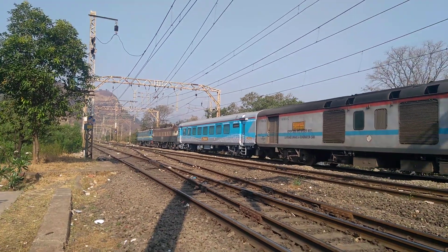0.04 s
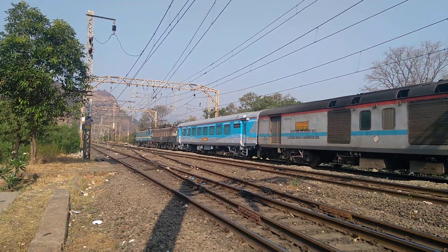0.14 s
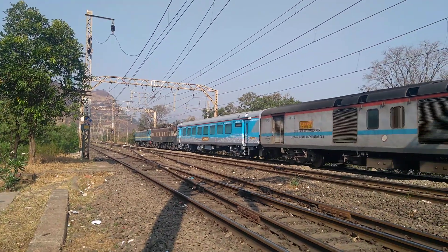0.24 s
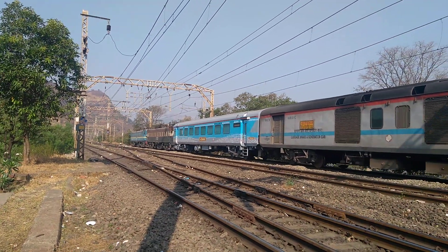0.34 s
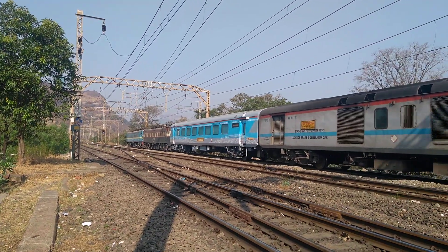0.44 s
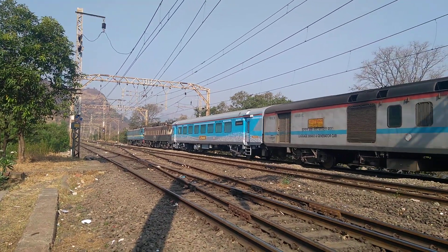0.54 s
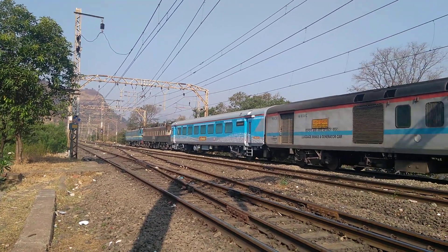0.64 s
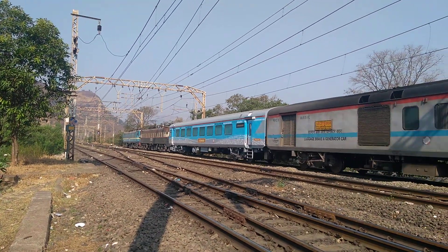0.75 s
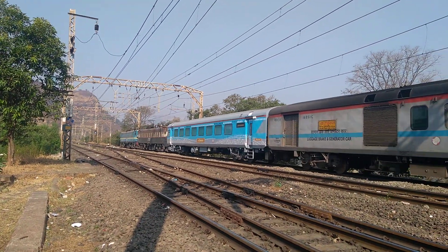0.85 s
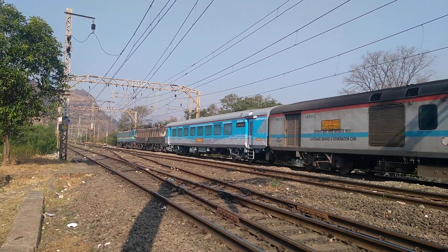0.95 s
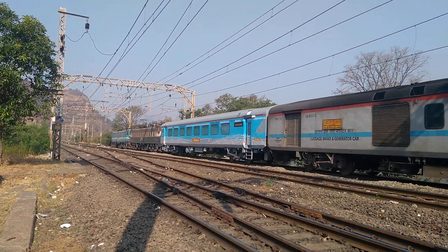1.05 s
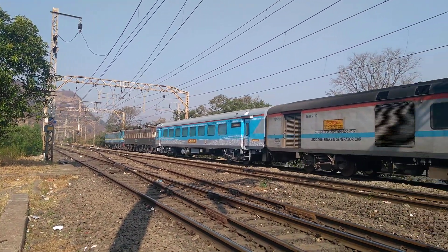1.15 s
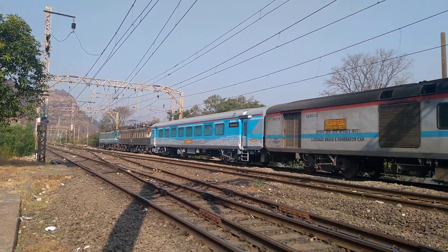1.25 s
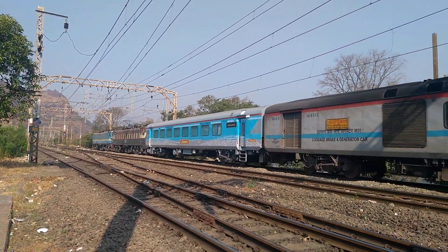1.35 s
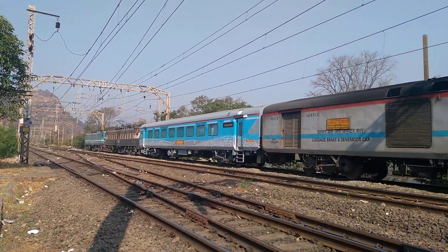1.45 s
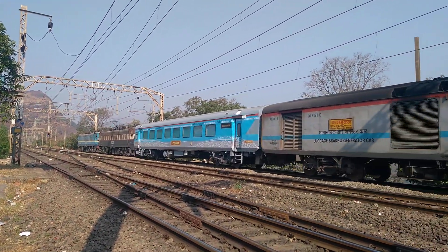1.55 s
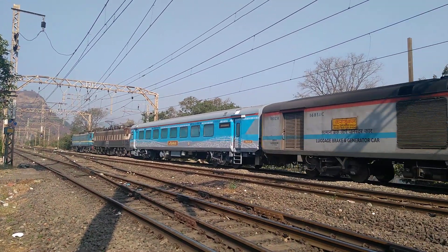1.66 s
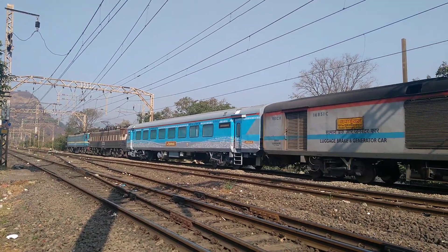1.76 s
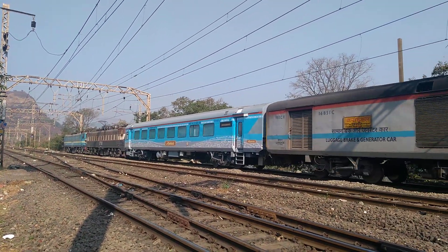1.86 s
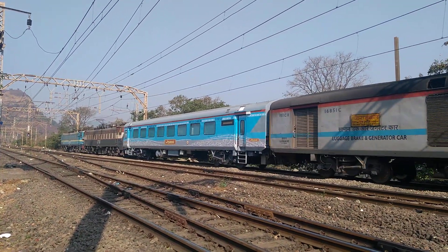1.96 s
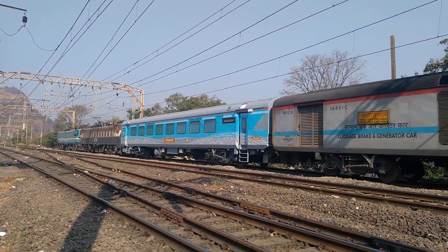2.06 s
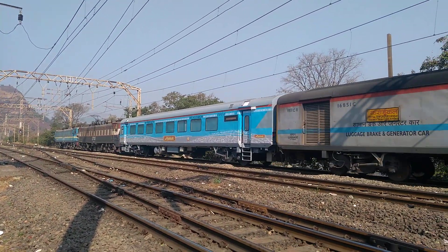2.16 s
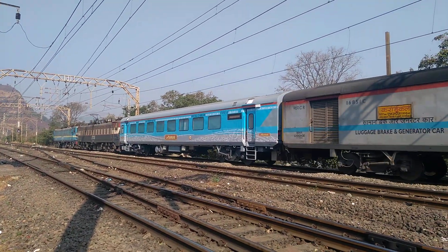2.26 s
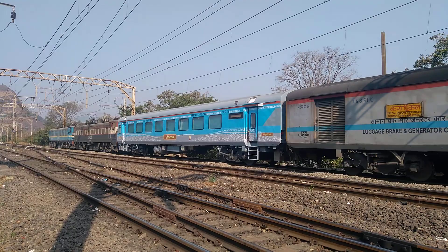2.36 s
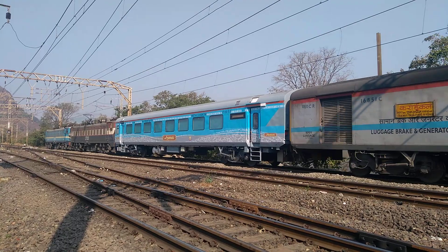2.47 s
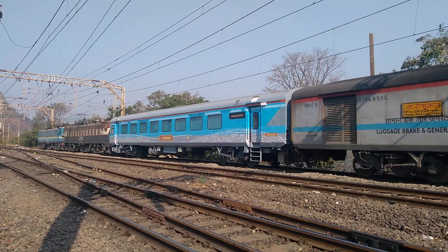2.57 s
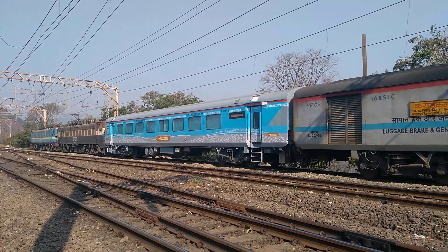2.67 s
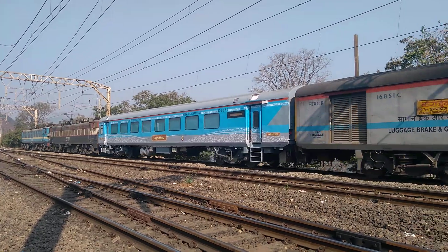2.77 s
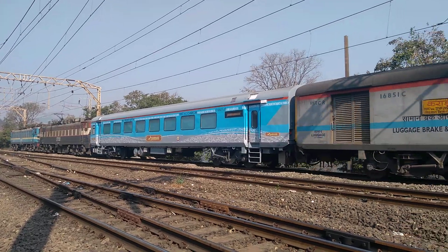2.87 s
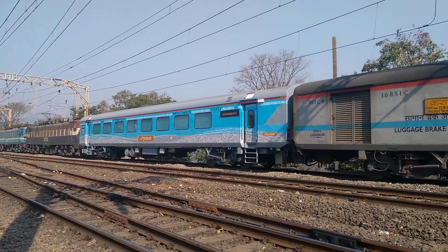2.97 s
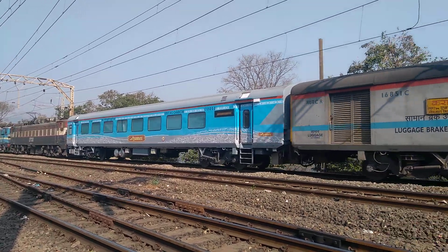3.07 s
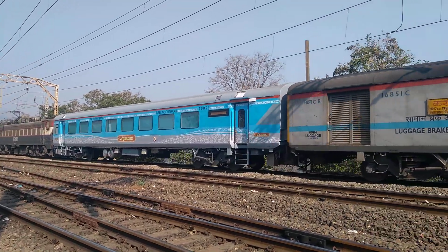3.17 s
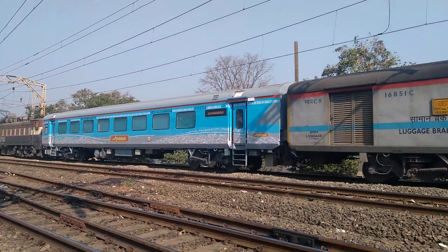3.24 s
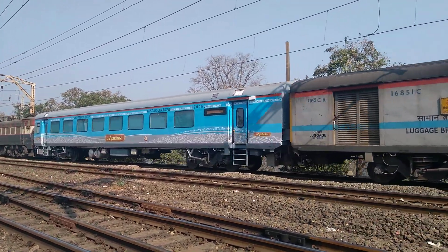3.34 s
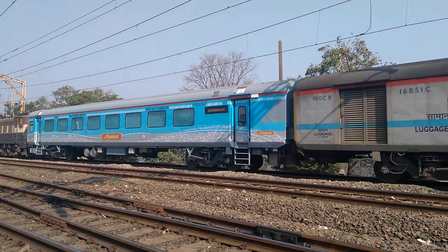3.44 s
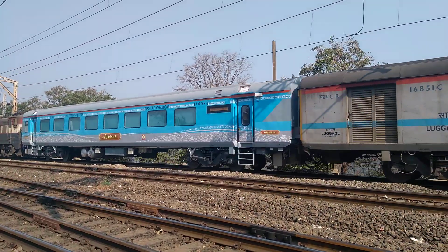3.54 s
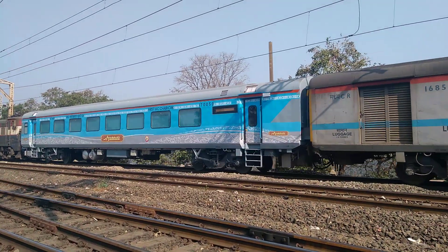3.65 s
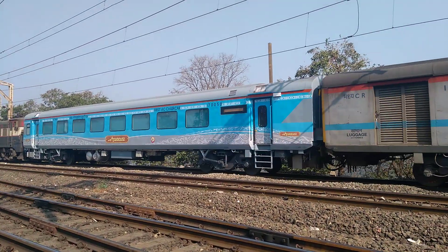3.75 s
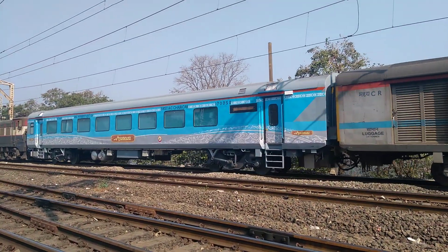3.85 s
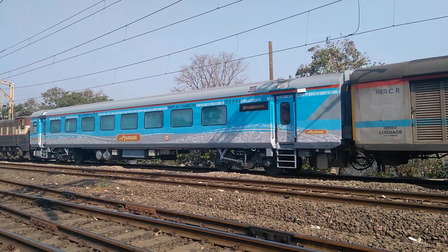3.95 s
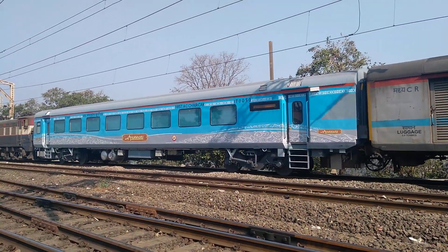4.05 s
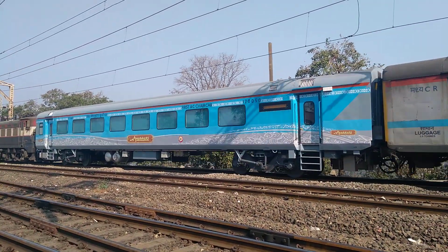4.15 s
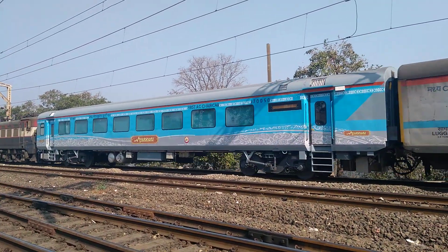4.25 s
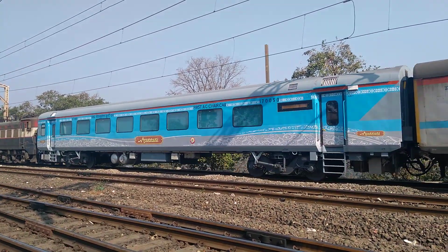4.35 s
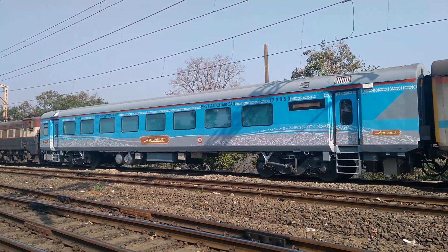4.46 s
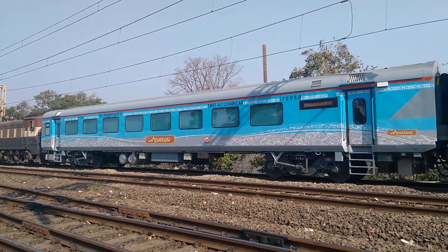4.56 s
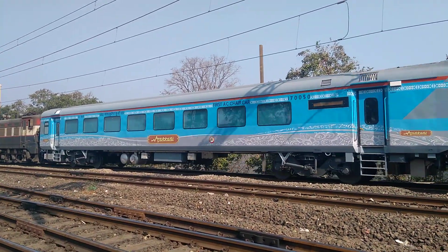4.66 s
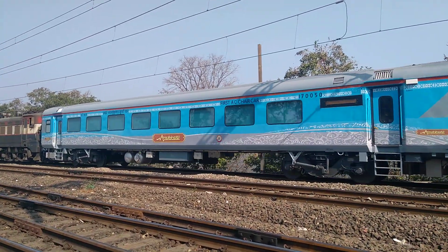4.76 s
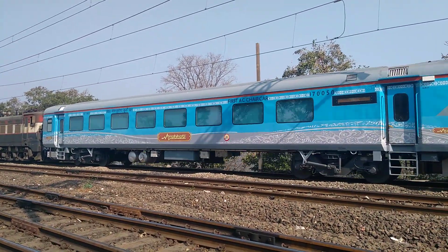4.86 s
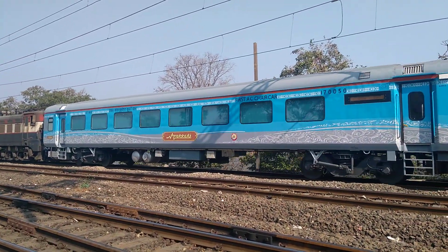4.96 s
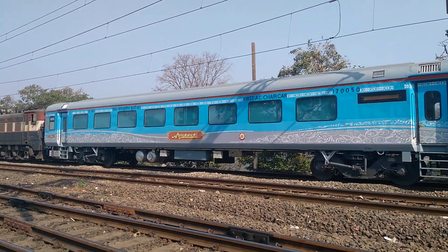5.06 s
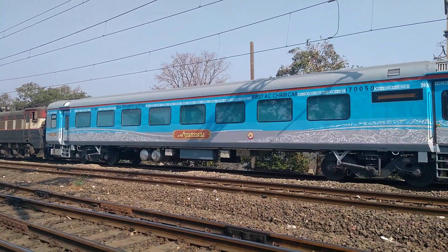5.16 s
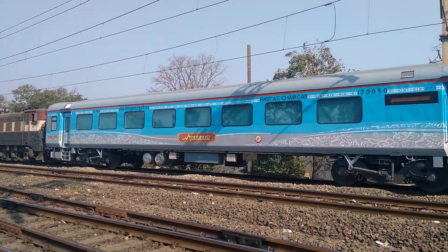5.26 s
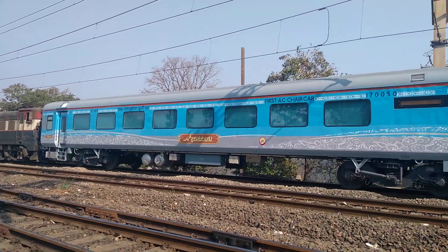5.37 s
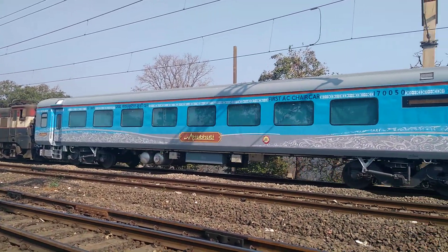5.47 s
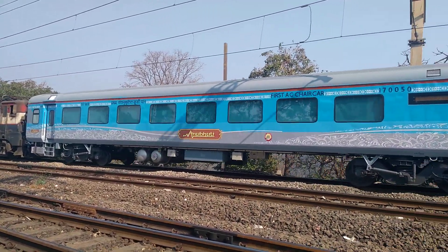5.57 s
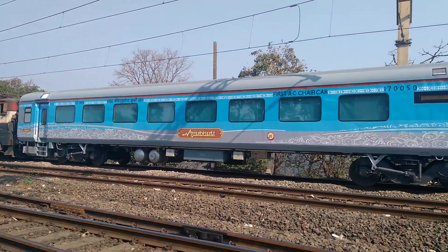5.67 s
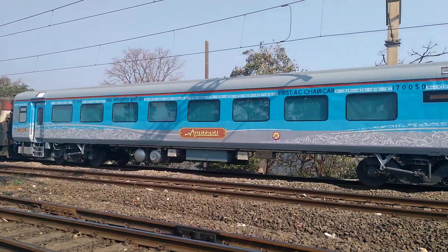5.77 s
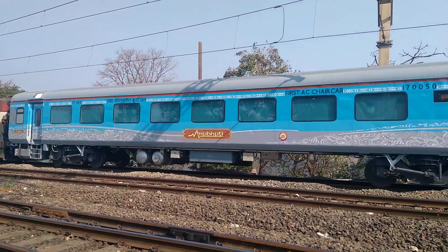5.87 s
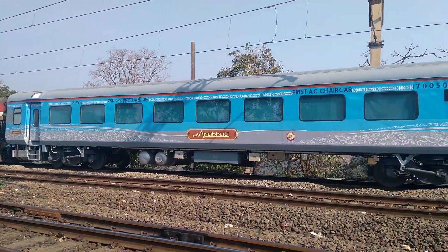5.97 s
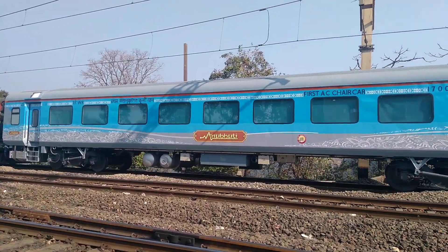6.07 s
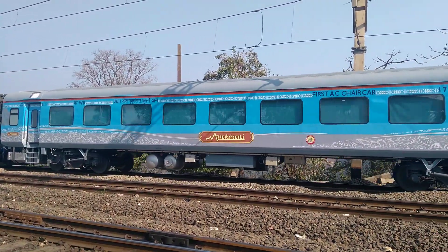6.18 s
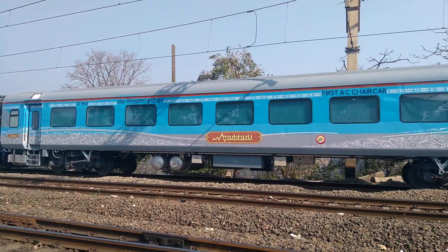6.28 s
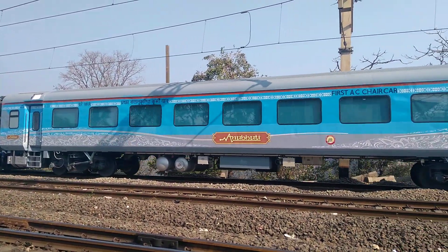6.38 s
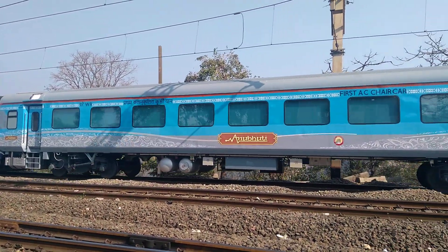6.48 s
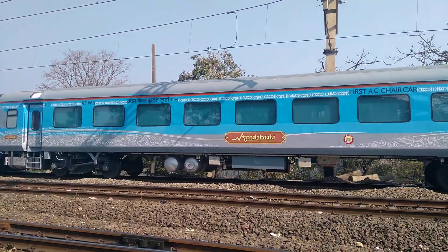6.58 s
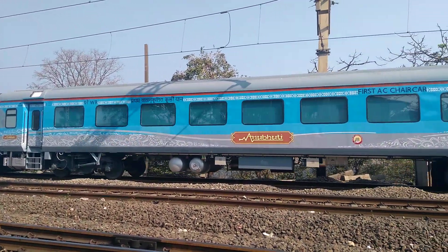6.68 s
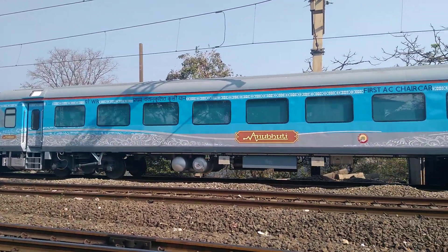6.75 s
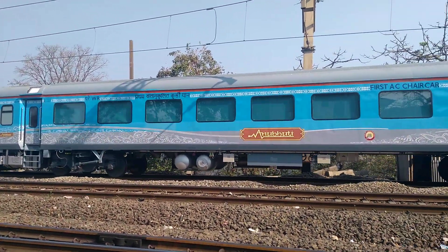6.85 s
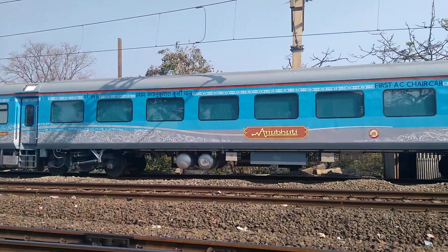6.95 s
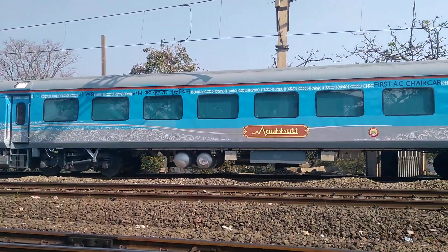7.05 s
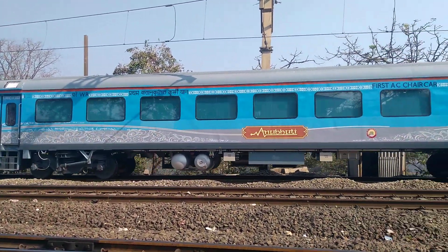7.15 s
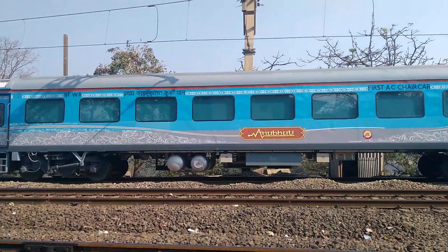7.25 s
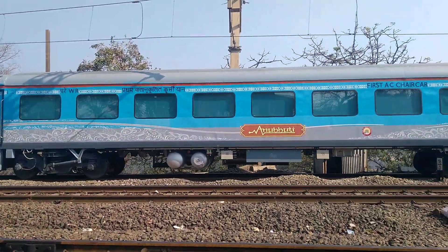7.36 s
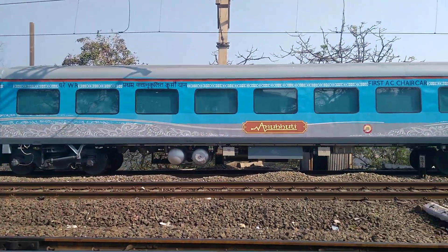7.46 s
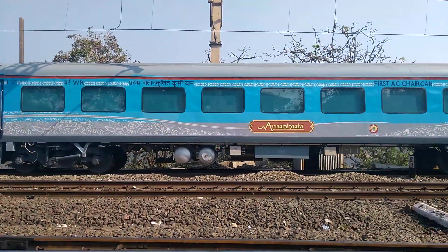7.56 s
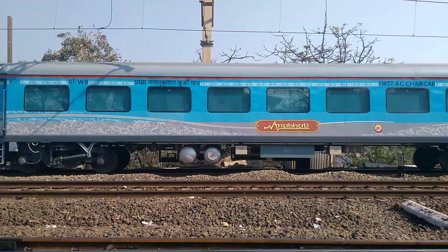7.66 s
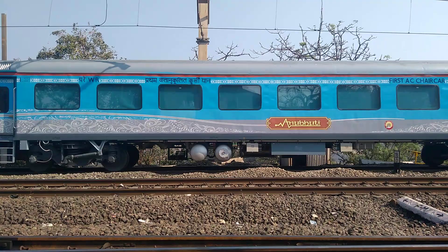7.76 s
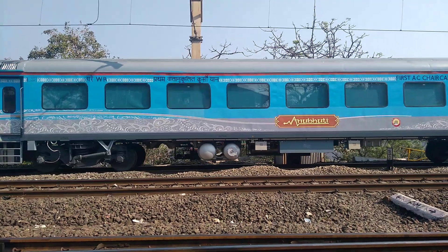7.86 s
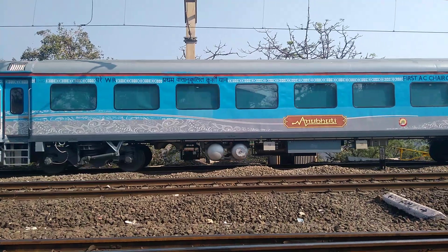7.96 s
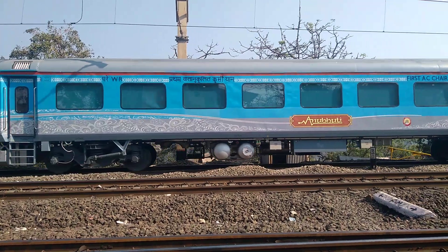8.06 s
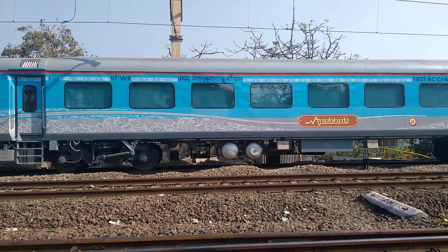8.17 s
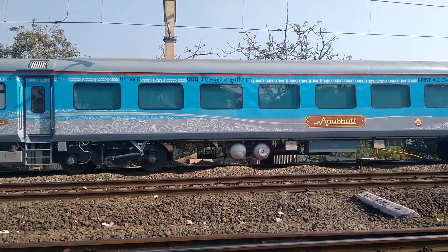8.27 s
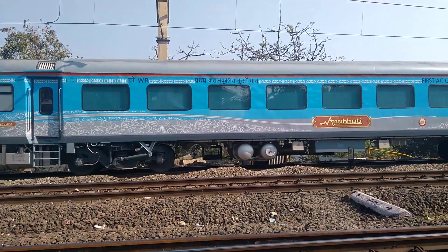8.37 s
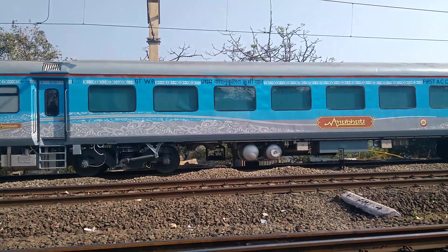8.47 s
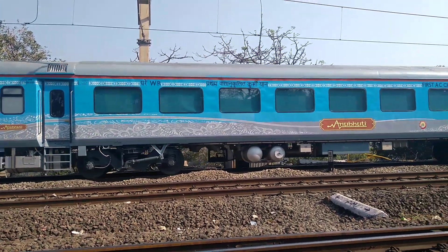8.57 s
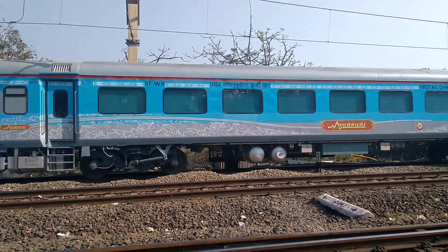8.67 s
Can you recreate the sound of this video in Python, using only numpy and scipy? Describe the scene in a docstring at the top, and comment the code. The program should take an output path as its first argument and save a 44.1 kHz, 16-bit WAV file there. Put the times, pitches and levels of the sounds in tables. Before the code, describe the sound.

Outdoors a few tracks from a slowly rolling train, a generator car's diesel drones deeply with a beating fan hum, hollow metallic roar and bright hiss. It draws away to one side, sliding duller and softer. From the other side, steady wheel rolling emerges, with short rattling rail-joint knocks, brief squeaks and a faint growing locomotive hum. Stereo microphone ports a hand apart, dry open air.

```python
"""Open country, a few tracks away from a train that rolls slowly past.
To one side its generator car drones as it draws away: sine tones from the engine, fan and blower, and noise
shaped into rumble, roar, ringing casing, hiss and whistles. From the other side come rolling noise, clicks
that ring the wheels, short squeaks and the humming noise of the pushing locomotives.
Two microphone ports a hand apart hear most sources with a small lag between them."""
import sys
import numpy as np
from scipy import signal
from scipy.io import wavfile
from scipy.ndimage import map_coordinates

SR = 44100
rng = np.random.default_rng(int(sys.argv[2]) if len(sys.argv) > 2 else 0)


def to_wav(s):
    """Save 16-bit WAV."""
    ch = np.atleast_2d(s).T  # columns
    pcm = np.round(np.clip(ch, -1, 1) * 32767)  # PCM
    wavfile.write(sys.argv[1], SR, pcm.astype(np.int16))


N = 384552


def seconds():
    """Time of every sample."""
    return np.arange(N) / SR


def from_db(db):
    """Turn a level in dB into a gain."""
    return np.exp(np.asarray(db) * (np.log(10) / 20))


def rms_one(x):
    """Scale a sound to an average strength (rms) of 1."""
    return x / np.sqrt(np.mean(x ** 2) + 1e-20)


def in_time(rows):
    """Draw straight lines between the rows of a table, for each column after the time."""
    times, *columns = np.transpose(rows)
    return [np.interp(seconds(), times, column) for column in columns]


def at_hz(points, hz):
    """Read a table of frequencies on a logarithmic frequency axis."""
    table_hz, values = np.array(points).T
    return np.interp(np.log(hz), np.log(table_hz), values)


def lobe_db(start, end, db, rise_db, fade_db):
    """A level that holds from start to end and slopes away on both sides, in dB per second."""
    t = seconds()
    return db - rise_db * np.maximum(start - t, 0) - fade_db * np.maximum(t - end, 0)


def drift(rate):
    """Slow random wandering of spread 1; a higher rate wanders faster."""
    step = 40   # samples between the slow values
    r = np.exp(-2 * step * np.pi * rate / SR)
    noise = rng.standard_normal(N // step + 2002)
    slow = signal.lfilter([1], [1, -2 * r, r * r], noise)[2000:]   # drop the filter's start
    return np.interp(np.arange(N) / step, np.arange(len(slow)), rms_one(slow))


def resonate(x, hz, width_hz):
    """Ring at one frequency, longer when the width is smaller (two-pole resonance)."""
    r = np.exp(-np.pi * width_hz / SR)
    feedback = [1, -2 * r * np.cos(2 * np.pi * hz / SR), r * r]
    return signal.lfilter([(1 - r * r) / 2, 0, (r * r - 1) / 2], feedback, x + 1e-18)


def ports(x, lag, order=3):
    """Hear one source at both ports, the left one late by lag samples."""
    # low sounds and whole-sample lags need no smooth curve between samples, so a lower order will do
    at = np.arange(N)
    return map_coordinates(x, [[at - lag / 2, at + lag / 2]], order=order)


def field(lag, alike_hz=450, order=3):
    """Noise from one direction, and spread-out noise that is alike at both ports only in the bass."""
    direct = ports(rng.standard_normal(N), lag, order)
    mid, side = rng.standard_normal((2, N))
    side = signal.sosfilt(signal.butter(1, alike_hz, "high", fs=SR, output="sos"), side)
    return direct, rms_one(mid + side * [[1], [-1]])


def banded(spectrum, fields, shares, balance, patchy_db, lost_db=0):
    """Build noise from bands with their own strength, flicker and treble loss; rms near 1 before the loss."""
    low, high = spectrum[0][0], min(spectrum[-1][0], 16000)
    edges = np.geomspace(low, high, round(2.5 * np.log2(high / low)) + 1)   # about 2.5 bands per octave
    out, power, together = 0, 0, drift(11)
    for k, (a, b) in enumerate(zip(edges, edges[1:])):
        hz = np.sqrt(a * b)
        direct, spread = fields[k % 2]   # neighbouring bands use different noise
        share = np.clip(at_hz(shares, hz), 0, 1)
        white = np.sqrt(share) * direct + np.sqrt(1 - share) * spread
        band = rms_one(signal.sosfilt(signal.butter(2, [a, b], "band", fs=SR, output="sos"), white))
        gain = from_db(at_hz(spectrum, hz)) * np.sqrt(b - a)
        side = from_db(at_hz(balance, hz) / 2 * np.array([[1], [-1]]))
        flicker_db = patchy_db * (0.45 * together + 0.85 * drift(14))
        # the loss grows with frequency
        out = out + gain * side * from_db(flicker_db - lost_db * hz / 10000) * band
        power += gain ** 2
    return out / np.sqrt(power)


HUM_HZ, HUM_WIDTH_HZ = 716, 103
HUM_END_DB, HUM_RISE_DB_PER_S = -47, 1.5   # level at the end, and how it grows until then


def locomotive_hum(lag):
    """The pushing locomotives: noise through one resonance, growing steadily louder."""
    hum_db = HUM_END_DB - HUM_RISE_DB_PER_S * (N / SR - seconds())
    hum = rms_one(resonate(rng.standard_normal(N), HUM_HZ, HUM_WIDTH_HZ))
    return ports(from_db(hum_db) * hum, lag, order=1)


# how loud the bogies (the wheel frames) roll: (time [s], level [dB])
ROLLING_LEVEL = [(0, -46), (2, -51), (3, -43.5), (4.2, -44.5), (5.5, -44.5), (6.8, -45.5), (7.4, -42.5),
                 (8.1, -43.5), (8.5, -41), (8.72, -40.5)]
# tone colour of the rolling: (frequency [Hz], relative level [dB per Hz])
ROLLING_SPECTRUM = [(60, -12), (100, 11), (200, -10), (300, -3), (520, -9), (1000, -8), (1500, -7),
                    (2000, -6.5), (3000, -10.5), (4200, -11.5), (5500, -18.5), (7000, -7.5), (10000, -51.5),
                    (15700, -63)]
# how much of the rolling comes from one point: (frequency [Hz], share of power [0 to 1])
ROLLING_DIRECT = [(100, 0.4), (700, 1), (2500, 0.48), (4500, 0.32), (9000, 0.088)]
# balance of the rolling between the ports: (frequency [Hz], left minus right [dB])
ROLLING_BALANCE = [(60, -8), (180, 3), (550, 9.5), (1650, 1), (4970, -4.5), (15000, 16)]


def rolling(lag):
    """Wheels rolling on rails: broad noise in flickering bands, partly from one direction."""
    level_db, = in_time(ROLLING_LEVEL)
    fields = [field(lag, order=0), field(lag, order=0)]
    return from_db(level_db) * banded(ROLLING_SPECTRUM, fields, ROLLING_DIRECT, ROLLING_BALANCE, patchy_db=1.1)


# short squeaks: (time [s], frequency [Hz], level before the soft start and decay [dB])
SQUEAKS = [(2.92, 2400, -48), (6.814, 2580, -40), (7.62, 2390, -38), (7.625, 3100, -41)]


def squeaks():
    """Short sine tones with a soft start, a quick decay and an unsteady pitch."""
    out, waver = 0, drift(60)
    for start, hz, db in SQUEAKS:
        age = np.maximum(seconds() - start, 0)
        shape = (1 - np.exp(-age / 0.015)) * np.exp(-age / 0.02)
        out = out + from_db(db) * shape * np.sin(2 * np.pi * hz * age + 0.9 * waver)
    return out * from_db([[1.5], [-3]])   # left, right


# wheels over rail joints: (time [s], strength [dB], hold [s], brightness [dB per octave])
JOINTS = [(2.09, -46, .01, 9), (4.368, -48, .01, 0.1), (5.48, -52, .01, 6), (6.158, -49, .01, -9),
          (6.264, -51, .01, 0.1), (6.808, -46, .01, 0), (6.885, -50, .01, -5), (7.208, -50, .01, -1),
          (7.327, -45, 0.02, -1), (7.411, -44, 0.031, 2.5), (7.483, -50.5, .02, 2), (7.612, -50, 0.023, 0),
          (8.379, -43, 0.025, 1), (8.413, -50, .006, -6), (8.444, -53, .01, 5), (8.507, -46, .01, -6),
          (8.548, -59, 0.011, -5)]
# ringing tones of a wheel: (frequency [Hz], relative level [dB], time to fade by 60 dB [s])
WHEEL_TONES = [(2400, -13, .012), (3000, -8, .012), (3490, -1, .014), (3700, -2, .012), (4100, -4, .008),
               (4520, 1, .014), (4930, -6, .01), (5350, -8, .01), (5880, -7, .01), (6420, -9, .01),
               (7300, -10, .008), (8200, -13, .006), (9300, -16, .005), (10600, -19, .004)]
KNOCK_RISE_S, KNOCK_FADE_S = 0.003, 0.019
KNOCK_LAG = -14   # samples by which left lags right


def clatter():
    """Each rail joint shakes loose a swarm of clicks that rises, holds and fades, and rings the wheel."""
    near = np.arange(-SR // 20, SR // 6)   # samples around a joint
    t, out = near / SR, 0
    pivot_hz = WHEEL_TONES[2][0]   # brightness tilts around this tone
    for hz, tone_db, fade_60_s in WHEEL_TONES:
        swarm = np.zeros(N + SR)
        for start, db, hold, bright_db in JOINTS:
            shape = np.exp(-(np.minimum(t, 0) / KNOCK_RISE_S) ** 2 - np.maximum(t - hold, 0) / KNOCK_FADE_S)
            swarm[int(start * SR) + near] += from_db(db + bright_db * np.log2(hz / pivot_hz)) * shape
        clicks = (rng.random(N) < 2000 / SR) * rng.standard_normal(N)   # about 2000 a second
        ring = resonate(clicks * swarm[:N], hz, 3 * np.log(10) / np.pi / fade_60_s)
        out = out + from_db(tone_db) * ring * np.sqrt(fade_60_s * SR)
    return ports(out, KNOCK_LAG, order=1) * from_db([[-2.5], [1.5]])   # left, right


# direction of the car as it draws away and the ports turn after the train:
# (time [s], lag of left behind right [samples])
CAR_DIRECTION = [(0, 6.8), (.75, 8.6), (1.25, 9.7), (1.75, 10.1), (2.25, 11.2), (2.75, 11.8), (3.75, 12.6),
                 (5.25, 14), (6.25, 13.6), (7.25, 13), (8.72, 11.5)]
# distance of the car's track, how far past the car is at the start, and its speed
TRACK_M, START_M, SPEED_M_PER_S = 15, 6.5, 4.5


def passing():
    """The car's distance, in doublings of the track's distance, and its lag between the ports."""
    metres = np.hypot(TRACK_M, START_M + SPEED_M_PER_S * seconds())
    return np.log2(metres / TRACK_M), in_time(CAR_DIRECTION)[0]


# how much of the car's noise comes from one point: (frequency [Hz], share of power [0 to 1])
CAR_DIRECT = [(100, 0.4), (300, 0.48), (700, 0.55), (1400, 0.65), (1900, 0.85), (2400, 0.85), (3300, .75),
              (4400, 0.4), (5500, .35), (7500, 0.45), (14000, 0.5)]
# balance of the car's noise between the ports: (frequency [Hz], left minus right [dB])
CAR_BALANCE = [(60, 1), (180, 2), (550, 1), (1650, -0.5), (4970, 1.5), (15000, 5.5)]


def car_noise(spectrum, fields, patchy_db, lost_db=0):
    """Banded noise with the direction and left-right balance of the generator car."""
    return banded(spectrum, fields, CAR_DIRECT, CAR_BALANCE, patchy_db, lost_db)


# tone colour of the rumble: (frequency [Hz], relative level [dB per Hz])
RUMBLE_SPECTRUM = [(18, -18), (35, -11), (55, -9), (90, 0.5), (125, -1), (190, -2), (260, -1.5)]
RUMBLE_DB, RUMBLE_LOSS_DB = -34.5, 6   # level at the track's distance, loss per doubling of distance


def rumble(fields, doublings):
    """Low noise that weakens with distance."""
    level_db = RUMBLE_DB - RUMBLE_LOSS_DB * doublings
    return from_db(level_db) * car_noise(RUMBLE_SPECTRUM, fields, patchy_db=0.1)


# how loud the casing roars: (time [s], level [dB])
ROAR_LEVEL = [(0, -34.5), (.7, -37), (1.5, -34.5), (2.3, -35.5), (3.2, -36.5), (4.2, -39.5), (5.2, -41.5),
              (6.5, -44), (8.72, -46.5)]
# tone colour of the roar: (frequency [Hz], relative level [dB per Hz])
ROAR_SPECTRUM = [(230, -4), (350, 5.5), (500, 5.5), (700, 1.5), (1000, -4), (1300, -2), (1700, -22)]


def roar(fields):
    """Casing roar: mid-range noise in gently flickering bands."""
    level_db, = in_time(ROAR_LEVEL)
    return from_db(level_db) * car_noise(ROAR_SPECTRUM, fields, patchy_db=0.6)


# level of the sliding roar: (hold from [s], hold to [s], level [dB], rise [dB per s], fade [dB per s])
SLIDE_LEVEL = (-2.2, 3.5, -37, 12, 7)
SLIDE_S = 1.2   # time scale of the slide


def sliding_roar(from_hz, to_hz, width_hz, lag):
    """A broad band of roar that slides down and settles: low-passed noise carried up to a moving centre."""
    centre_hz = to_hz + (from_hz - to_hz) * np.exp(-(seconds() / SLIDE_S) ** 1.4)
    phase = 2 * np.pi * np.cumsum(centre_hz) / SR
    low_pass = signal.butter(2, width_hz / 2, fs=SR, output="sos")
    a, b = signal.sosfilt(low_pass, rng.standard_normal((2, 2, N)))
    direct, spread = a * np.cos(phase) + b * np.sin(phase)
    both = ports(direct, lag, order=1) + 0.23 * spread * [[1], [-1]]
    return from_db(lobe_db(*SLIDE_LEVEL)) * rms_one(both)


def beams(table, noise, waver_db, waver_rate):
    """Noise through pairs of equal resonances, each with its own rise, hold and fade."""
    out = 0
    for hz, width_hz, *beam in table:
        ring = rms_one(resonate(resonate(noise, hz, width_hz), hz, width_hz))
        out = out + from_db(lobe_db(*beam) + waver_db * drift(waver_rate)) * ring
    return out


# casing resonances and when each beams this way: (frequency [Hz], width of each resonance in the pair [Hz],
# from [s], to [s], level [dB], rise [dB per s], fade [dB per s])
CASING_BEAMS = [(308, 35, 2.8, 3.4, -41, 9, 8), (411, 36, 1.05, 1.7, -39, 16, 12),
                (405, 40, 2.25, 2.7, -38, 16, 14), (490, 45, 4.0, 4.75, -39.5, 8, 20),
                (500, 50, 1.2, 1.65, -43, 12, 16), (545, 70, 2.6, 3.8, -43, 10, 6),
                (322, 22, 4.2, 5.4, -48, 6, 14), (320, 26, 6, 7.0, -47, 14, 10),
                (494, 26, 5.2, 6.1, -53, 10, 10), (860, 130, 1.2, 1.9, -48, 12, 10),
                (220, 30, .9, 1.5, -43, 12, 12), (300, 30, 8.35, 8.72, -49, 16, 16)]


def casing(noise):
    """The metal casing, shaken by noise, rings at its own frequencies."""
    return beams(CASING_BEAMS, noise, waver_db=1.0, waver_rate=2.5)


# hiss of the car: (time [s], level before the treble loss [dB])
HISS_LEVEL = [(0, -39), (.6, -35), (1.2, -37), (1.9, -37.5), (2.4, -39), (3, -42.5), (4, -45), (5, -47),
              (6.5, -47.5), (8.72, -50)]
# tone colour of the hiss: (frequency [Hz], relative level [dB per Hz])
HISS_SPECTRUM = [(1300, 7.5), (2000, 4), (2800, 4.5), (3500, 2), (4200, 0.5), (5200, -1.5), (6000, -2.5),
                 (7000, -2), (7800, -2), (8500, -1), (9300, -4.5), (10000, -4), (12000, -26), (14000, -16),
                 (15700, -28)]
# treble loss of the hiss, rising and falling: (time [s], loss at 10 kHz [dB])
HISS_TREBLE_LOSS = [(0, -1), (.6, 5), (1.3, -1), (2.2, -2.5), (4.4, -1.5), (5.4, 4.5), (7.2, 5), (8.72, 1)]


def hiss(fields):
    """Louvre hiss: high noise whose treble loss rises and falls."""
    (level_db,), (lost_db,) = in_time(HISS_LEVEL), in_time(HISS_TREBLE_LOSS)
    return from_db(level_db) * car_noise(HISS_SPECTRUM, fields, patchy_db=1.0, lost_db=lost_db)


# breathy whistles and when each is heard: (frequency [Hz], width of each resonance in the pair [Hz],
# from [s], to [s], level [dB], rise [dB per s], fade [dB per s])
WHISTLE_BEAMS = [(8690, 330, .55, .75, -58, 30, 30), (8480, 520, 1.15, 2.3, -57, 22, 12),
                 (6580, 300, 1.35, 1.6, -55, 28, 28), (9580, 330, .45, 1.4, -61, 16, 16),
                 (9400, 650, 2, 2.4, -58.5, 16, 3.5), (10700, 1000, 1.1, 2.6, -57.5, 9, 6)]


def whistles(noise):
    """Breathy whistling: noise through high resonances that come and go."""
    return beams(WHISTLE_BEAMS, noise, waver_db=1.0, waver_rate=3.0) * from_db([[1.5], [-1.5]])


# times when the blower swells: (from [s], to [s], level [dB])
BLOWER_SWELLS = [(0, 0.443, -37.5), (3.2, 4.295, -44)]
BLOWER_RATIO = 3.286   # blower pitch over firing pitch
BLOWER_DB, BLOWER_LOSS_DB = -47, 6   # level at the track's distance, loss per doubling of distance
BLOWER_FADE_DB_PER_S = 26   # slope on both sides of a swell


def blower(firing, doublings):
    """A sine tied to the firing pitch; the louder of its swells and its fading steady level is heard."""
    fade = BLOWER_FADE_DB_PER_S
    levels = [lobe_db(start, end, db, fade, fade) for start, end, db in BLOWER_SWELLS]
    levels.append(BLOWER_DB - BLOWER_LOSS_DB * doublings)
    return from_db(np.max(levels, axis=0) + 1.5 * drift(5.8)) * np.sin(BLOWER_RATIO * firing)


# weaker engine tones: (order [cycles per crankshaft turn], level [dB], how strongly it follows the roar [dB per dB])
WEAK_ORDERS = [(2, -59, 0.58), (3.5, -67, 1.1), (4, -54.5, 1.94), (8, -58, 0.24), (9, -53, 0.54),
               (11, -52.5, 0.7), (12, -50, 0.96), (13, -57, 0.4), (14, -58.5, 2), (17, -56, 1.0),
               (19, -57, .3), (20, -55, 0.97)]


def weak_orders(firing):
    """Sines at multiples of the crankshaft's turning rate, a third of the firing rate."""
    roar_db, = in_time(ROAR_LEVEL)
    out = 0
    for order, db, follows in WEAK_ORDERS:
        # ground echoes shift as the car moves
        wander_db = follows * (roar_db - roar_db.mean()) + 2.8 * drift(0.61)
        out = out + from_db(db + wander_db) * np.sin(order / 3 * firing + 2 * np.pi * rng.random())
    return out


# pitches, sinking as the car draws away: (time [s], firing [Hz], fan [Hz])
ENGINE_PITCH = [(0, 76.4, 149.36), (1.26, 75.9, 148.3), (1.9, 75.9, 147.95), (2.6, 75.55, 147.37),
                (3.7, 75.56, 147.45), (4.1, 75.48, 147.0), (4.75, 74.85, 146.33), (5.5, 74.85, 146.33),
                (6.12, 75.01, 146.59), (6.8, 74.75, 146.1), (7.5, 74.91, 146.42), (8.3, 74.76, 146.15),
                (8.72, 74.78, 146.19)]
# firing tone: (time [s], level [dB])
FIRING_LEVEL = [(0, -31), (.5, -25.5), (1.2, -25.5), (2.1, -26.5), (2.9, -25), (3.55, -22.5), (4.2, -24),
                (4.7, -30.5), (5.1, -32), (6.1, -28), (6.7, -31), (7.3, -29), (7.7, -30.5), (8.3, -35.5),
                (8.72, -35.5)]
# the pair that beats: (time [s], second harmonic level [dB], fan level [dB])
BEATING_LEVELS = [(0, -47, -39), (.75, -38, -35), (1.2, -38, -34), (1.75, -48, -39.5), (2.2, -49, -37),
                  (2.5, -57, -37), (3, -51, -34.5), (3.4, -43, -37), (3.75, -41.5, -42), (4.05, -43, -48),
                  (4.45, -50, -39.5), (4.75, -64, -40), (5.25, -50.5, -43), (5.75, -50, -52),
                  (6.4, -53, -41), (7, -49, -41), (7.75, -44, -47), (8.25, -42, -48), (8.72, -42, -48)]
SIDE_TONES_HZ = 100
# the second harmonic falls back by this much around this time, and the beat with it
SLIP_S, SLIP_TURNS = 2.4, 0.21


def tones(doublings):
    """Six cylinders fire three times a turn; the fan runs just under the second harmonic and beats with it."""
    firing_hz, fan_hz = in_time(ENGINE_PITCH)
    (firing_db,), (second_db, fan_db) = in_time(FIRING_LEVEL), in_time(BEATING_LEVELS)
    firing, fan = 2 * np.pi * np.cumsum([firing_hz, fan_hz], axis=1) / SR
    middle = 2 * np.pi * SIDE_TONES_HZ * seconds()
    # firing tone with two faint side tones, at 100 Hz minus and plus the firing pitch
    sides = from_db(-19) * np.sin(middle - firing) + from_db(-23) * np.sin(middle + firing)
    firing_and_sides = from_db(firing_db) * (np.sin(firing) + sides)
    slip = 2 * np.pi * SLIP_TURNS / (1 + np.exp((SLIP_S - seconds()) / 0.08))
    second = from_db(second_db) * np.sin(2 * firing - slip)
    fan_tone = from_db(fan_db) * np.sin(fan)
    total = firing_and_sides + second + fan_tone + blower(firing, doublings) + weak_orders(firing)
    return np.sqrt(2) * total   # makes the levels rms levels


ROAR_LAG_SHARE = 0.87   # the low roar comes from a longer stretch of the car, nearer the middle


def generator_car():
    """Engine tones plus rumble, roar, ringing casing, hiss and whistles, moving as one car."""
    doublings, lag = passing()
    low_lag = ROAR_LAG_SHARE * lag
    high = [field(lag), field(lag)]
    low = [field(low_lag, order=1), field(low_lag, order=1)]
    shake, whine = [direct + 0.35 * spread for direct, spread in (low[0], high[0])]
    # the tones sit nearer the middle
    drone = ports(tones(doublings), 0.48 * lag, order=1) * from_db([[0.25], [-0.25]])
    slide = sliding_roar(639.2, 376, 172, low_lag)
    upper_slide = from_db(-12.5) * sliding_roar(1258, 740, 240, low_lag)   # a fainter band above
    body = rumble(low, doublings) + roar(low) + slide + upper_slide + casing(shake)
    return drone + body + hiss(high) + whistles(whine)


# direction of the bogies and locomotives: (time [s], lag of left behind right [samples])
BOGIE_DIRECTION = [(0, -12), (4.4, -12), (4.6, -10), (6.4, -10), (6.6, -12), (8.72, -13)]


def scene():
    """Bogies and locomotives on one side, the generator car on the other."""
    lag, = in_time(BOGIE_DIRECTION)
    return locomotive_hum(lag) + rolling(lag) + squeaks() + clatter() + generator_car()


CUTOFF_HZ = 15400


def record(dry):
    """Cut the very top of the treble with a steep low-pass filter."""
    return signal.sosfilt(signal.ellip(10, 0.5, 70, CUTOFF_HZ, fs=SR, output="sos"), dry)


dry = scene()
out = record(dry)
to_wav(out)
```